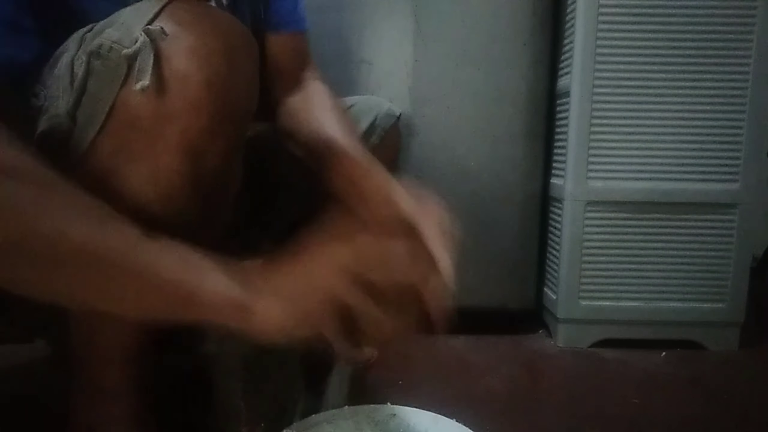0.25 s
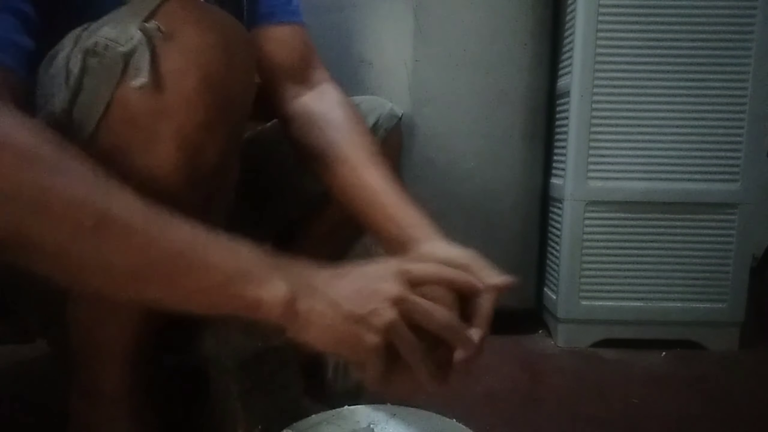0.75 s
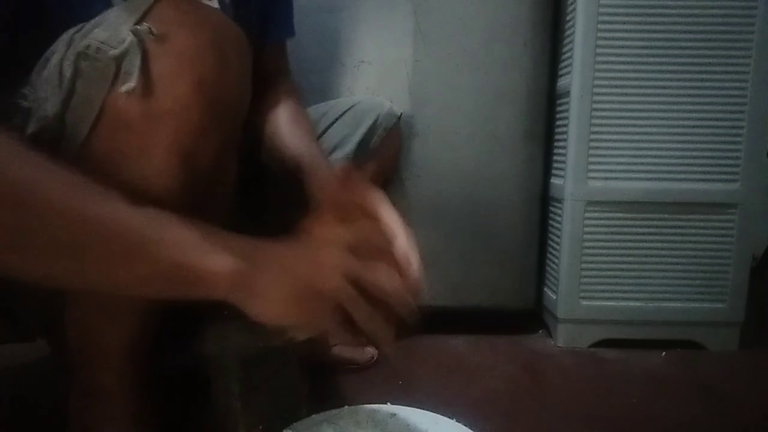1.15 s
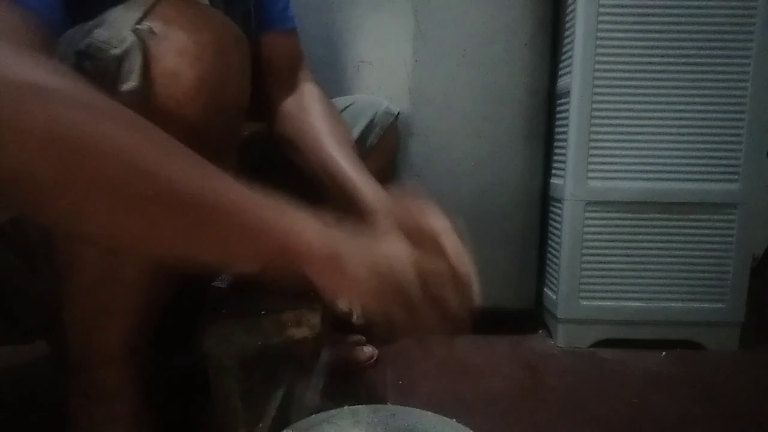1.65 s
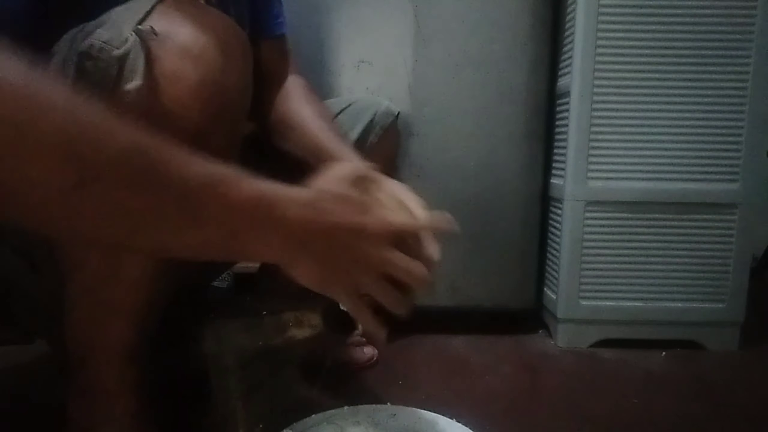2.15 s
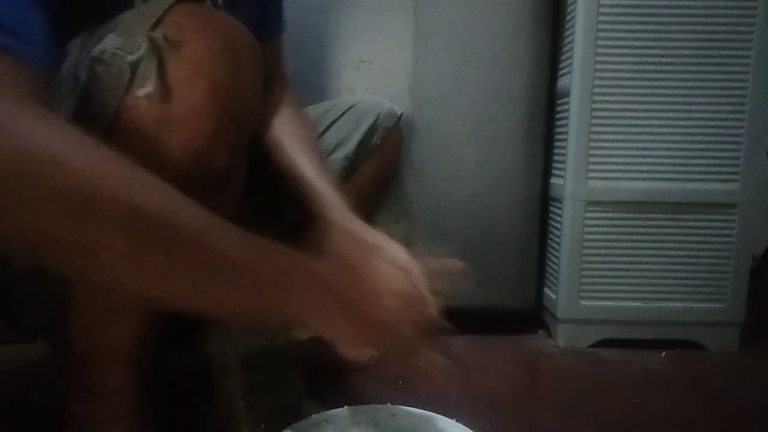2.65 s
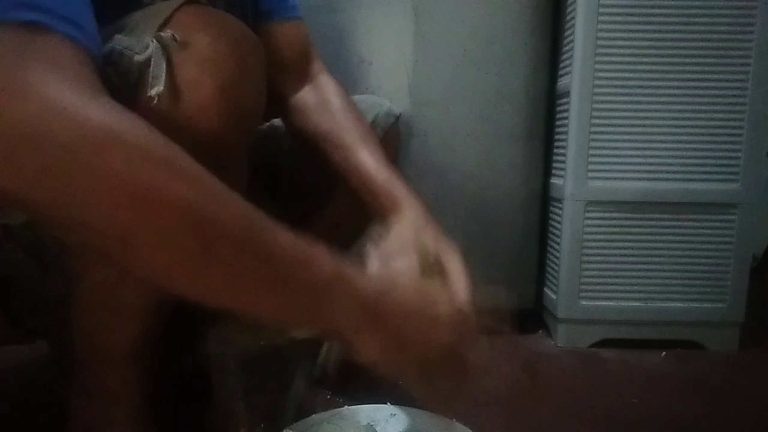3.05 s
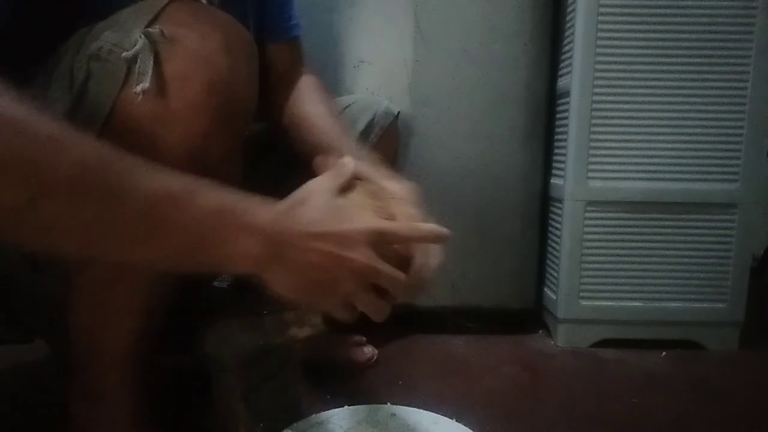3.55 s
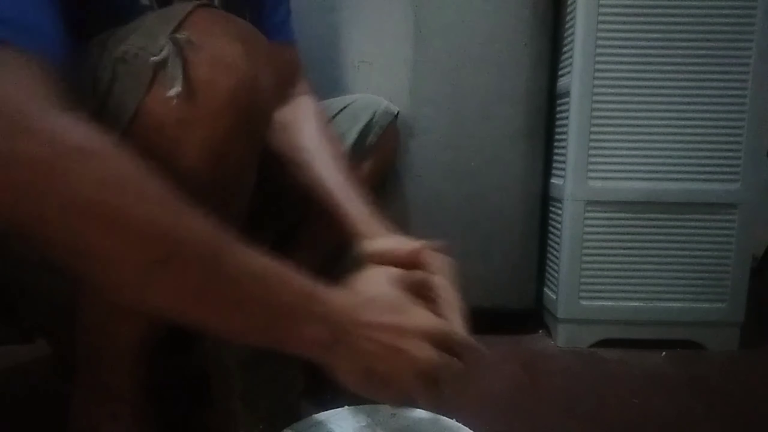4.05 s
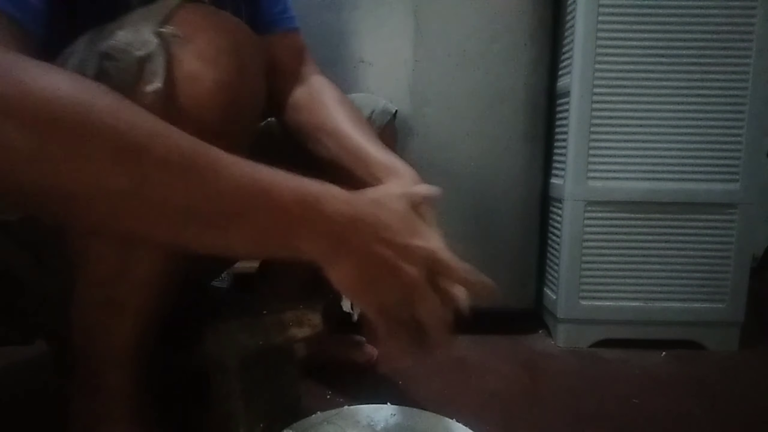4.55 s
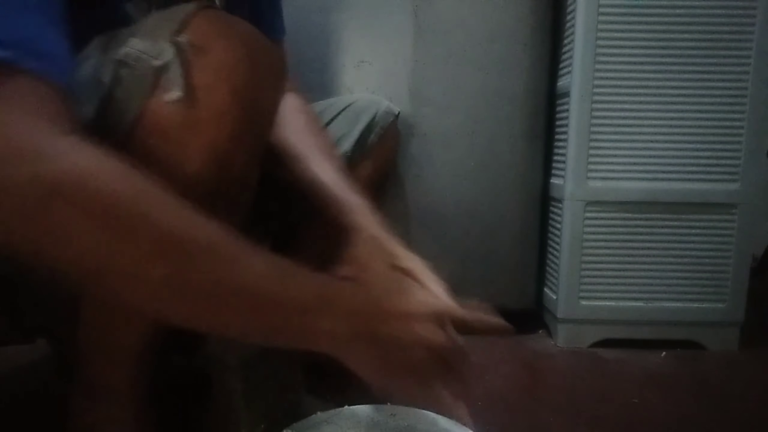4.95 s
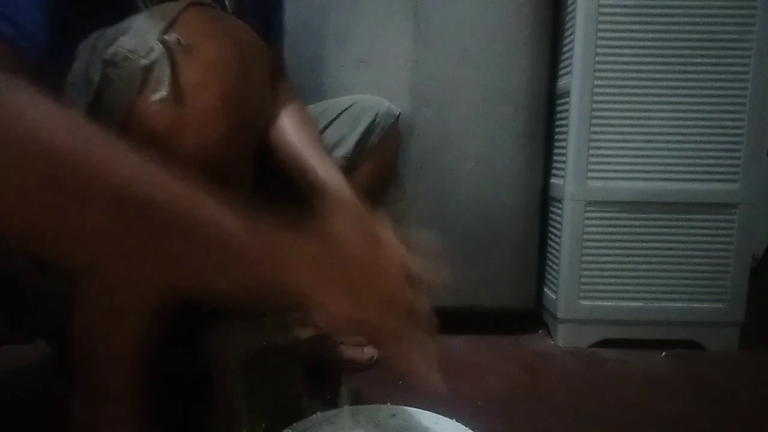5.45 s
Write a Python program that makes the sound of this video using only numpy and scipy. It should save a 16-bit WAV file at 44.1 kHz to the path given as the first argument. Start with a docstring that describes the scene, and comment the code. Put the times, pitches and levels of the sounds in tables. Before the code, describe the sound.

Half a coconut is rasped over a toothed metal blade in quick, short, woody scrapes, close up in a small hard room.

```python
"""A thin squeal dies away in the first third of a second, while the first strokes already begin.
Half a coconut is rasped over a toothed blade on a wooden stool, about three strokes a second: random snags
and harder bites drive damped modes of shell, blade and stool, and shaped noise tears the flesh.
The shell often taps the blade before a stroke; from 1.5 s on, resonant grit colours some light drags.
A small hard room and the low hum of the house last throughout; one phone microphone hears it all."""
import sys
import numpy as np
from scipy import signal
from scipy.fft import rfft, irfft, next_fast_len
from scipy.io import wavfile
from scipy.ndimage import uniform_filter1d

SR = 44100
rng = np.random.default_rng(int(sys.argv[2]) if len(sys.argv) > 2 else 0)


def linear_from_db(decibels):
    """Turn decibels (scalar or array-like) into linear amplitude factors; 0 gives 1."""
    return 10 ** (np.asarray(decibels, float) / 20)


def store_pcm(level_fs):
    """Save levels as 16-bit WAV."""
    pcm = np.round(np.clip(level_fs, -1, 1) * 32767).astype(np.int16)
    wavfile.write(sys.argv[1], SR, np.atleast_2d(pcm).T)


N = 251357
TIME = np.arange(N) / SR

# Damped modes of the struck parts. Each row: frequency in Hz, width in Hz, level in dB.
SHELL_HIGH_MODES = [(1372, 38, -1), (1524, 149, -5), (1646, 103, -2)]
SHELL_LOW_MODES = [(307, 41, -5.5), (421, 87.6, -4.5), (445.6, 53, -2.5), (523.5, 64, -6), (669, 63, -3.5),
                   (827, 105, 1.5), (931, 177, -0.5), (1072, 44, -5), (1157, 96, -13.5)]
BLADE_MODES = [(1949, 95, -2), (2331, 59, 1), (2510, 160, -4), (2857, 340, -3), (3070, 870, -12)]
STOOL_MODES = [(133, 18, 0), (168, 30, -6), (200, 22, -2)]
# Spectrum of tearing flesh. Each row: frequency in Hz, relative level in dB per Hz.
TEARING_SPECTRUM = [(900, 2), (1600, 6.5), (2400, -10.5), (3300, -2.5), (4100, -7.5), (5200, -11),
                    (8000, -14.5), (10000, -15.5), (12300, -16.5), (14000, -15), (16000, -5)]
# How each layer answers a stroke. Each holds: level in dB, then how strongly (as plain factors) it follows
# the rise, the fall, the lightness of the stroke and the push; last the curve of the fall, where
# 1 fades evenly and more holds on and stops short.
SHELL_HIGH_LAYER = (-0.017, 1.12, 1.34, 1.22, 0.47, 1.52)
SHELL_LOW_LAYER = (-0.77, 1, 1.02, 1.01, 0.45, 1.29)
BLADE_LAYER = (-3.5, 2.1, 1.16, 2.1, -1.1, 1.04)
STOOL_LAYER = (-12, -0.7, 0.7, 0.5, 3, 1.4)
TEARING_LAYER = (-6, 0.57, 0.85, 0.96, -0.43, 2.2)


def rasp():
    """Teeth plough the flesh: coarse snags ring shell, blade and stool, fine ones hiss; all judder together."""
    judder = linear_from_db(1.5 * walk(140) + 1.1 * walk(45))
    coarse = unit(judder * snags(rate=7000, scatter_db=1.2))
    fine = unit(np.sqrt(judder) * snags(rate=15000, scatter_db=1.2))
    skip = skips()
    parts = [(SHELL_HIGH_LAYER, SHELL_HIGH_MODES), (SHELL_LOW_LAYER, SHELL_LOW_MODES),
             (BLADE_LAYER, BLADE_MODES), (STOOL_LAYER, STOOL_MODES)]
    body = 0
    for layer, modes in parts:
        drive = coarse * contact_gain(layer) * skip
        # dividing by the steady ring puts all parts on one scale
        body = body + ring(drive, modes, wander_db=2.02) / np.std(ring(coarse, modes))
    fine = patchy(fine, patchy_db=2.2, rate=60)
    torn = colour(fine * contact_gain(TEARING_LAYER) * np.sqrt(skip), TEARING_SPECTRUM)
    return body + torn / np.std(colour(fine, TEARING_SPECTRUM))


# The strokes, light ones too. Each row: start in seconds, rise in seconds, fall in seconds,
# stroke level in dB, push into the stool in dB; each layer weighs the last two in its own way.
STROKES = [(0.073, 0.012, 0.022, -45, 0.5), (0.102, 0.076, 0.06, -28, 1), (0.386, 0.078, 0.11, -31.5, .5),
           (0.689, 0.058, 0.089, -31, 0), (1.21, 0.087, 0.076, -30, 0.5), (1.475, 0.065, .15, -44, -3),
           (1.535, 0.056, 0.098, -28, 2.5), (1.76, 0.068, .17, -50, -2.5), (1.829, 0.07, 0.1, -29.5, 0.5),
           (1.99, 0.041, 0.17, -45, -1.5), (2.367, 0.1, 0.068, -31.5, -0.5), (2.684, 0.056, 0.098, -29, 2),
           (2.981, 0.072, 0.09, -28.5, 1.5), (3.286, 0.054, 0.09, -26, 1.5), (3.732, 0.1, 0.082, -32, -3),
           (4.052, 0.046, 0.097, -29.5, -1), (4.341, .031, 0.058, -36.5, -2),
           (4.395, 0.029, 0.098, -34.5, -3), (4.79, .031, 0.053, -59, 1), (4.925, 0.09, 0.095, -34.5, -2),
           (5.233, 0.06, 0.091, -31.5, -0.5), (5.508, 0.075, 0.064, -32, -3.5)]
FULL_DB = -30  # stroke level at which every layer stands alike, push aside
# the teeth meet the flesh, then the level climbs, fast at first; layers scale the climb and the drop
CONTACT_S, RISE_DB, RISE_CURVE, FALL_DB = 0.014, 17.5, 2.87, 20.5
# the shell trails lightly over the teeth as it lifts, deeper down for layers that stop short
LINGER_DB, LINGER_FADE_DB_PER_S = -22.5, 75
# after a tap the shell slides lightly on the blade; level against the tap
DRAG_DB, DRAG_FADE_DB_PER_S = -27.5, 167
FUMBLE_DB = -70.5  # hands shift the shell; a steady floor before the layer level


def contact_gain(layer):
    """Gain of one layer over time: the strokes, the slide after each tap and the fumbling, added as powers."""
    layer_db, rise_share, fall_share, light_share, push_share, fall_curve = layer
    power = np.full(N, linear_from_db(2 * FUMBLE_DB))
    for s, rise, fall, peak_db, push_db in STROKES:
        at = slice(int(s * SR), int((s + rise + 4 * fall) * SR))
        t = TIME[at] - s
        before = np.clip(1 - t / rise, 0, 1)
        after = np.clip((t - rise) / fall, 0, None)
        top_db = FULL_DB + light_share * (peak_db - FULL_DB) + push_share * push_db
        climb_db = rise_share * RISE_DB * before ** RISE_CURVE
        drop_db = fall_share * FALL_DB * after ** fall_curve
        stroke = linear_from_db(top_db - climb_db - drop_db)
        linger = linear_from_db(top_db + fall_curve * LINGER_DB - LINGER_FADE_DB_PER_S * np.abs(t - rise))
        contact = np.clip(t / CONTACT_S, 0, 1)
        power[at] += (stroke ** 2 + linger ** 2) * contact ** 2
    for s, tap_db, *_ in TAPS:
        at = slice(int(s * SR), int(s * SR) + SR // 5)
        drag_db = tap_db + DRAG_DB - DRAG_FADE_DB_PER_S * (TIME[at] - s)
        power[at] += linear_from_db(2 * drag_db)
    return linear_from_db(layer_db) * np.sqrt(power)


def patchy(x, patchy_db, rate):
    """Teeth of different bite come and go, so each slice of the spectrum flickers by itself."""
    edges = np.geomspace(800, 17000, 17)
    out = 0
    for k, pair in enumerate(zip(edges, edges[1:])):
        band = signal.butter(2, pair, "band", fs=SR, output="sos")
        # neighbouring slices meet in opposite phase, so every other one is turned over
        out = out + (-1) ** k * signal.sosfilt(band, x) * linear_from_db(patchy_db * walk(rate))
    return out


# A tooth bites deep and lets go. Each row: time in seconds, relative level in dB,
# then low shell ring and crack, both in dB against that level.
BITES = [(0.119, -14.5, 0, -23), (0.134, -17, -9, -29), (0.167, -12, -8, -5), (0.399, -26, 8.5, -20),
         (0.418, -21, -17, -20), (0.459, -19, -23, -2), (0.698, -27, -5, -6), (0.719, -15, 5.5, 1.5),
         (1.247, -14, 9, -25), (1.271, -0.5, -6.5, -22), (1.552, -6, -8, -10), (1.579, -12, -16, -27),
         (1.859, -19, 12, -32), (1.903, -16, 12, -15), (2.41, -5.5, -22, -13), (2.444, -15, -24, 2),
         (2.702, -26, 1, 5), (2.715, -14, -19, -12), (2.742, -9.5, -24, -10), (2.773, -14, 9, -25),
         (3.017, 4.5, -23, -36), (3.06, -29, -10, -23), (3.296, -9.5, -13, -33), (3.314, -2, -19, -32),
         (3.349, -8, 3.5, -30), (3.804, -30, -7, -23), (4.064, -9.5, -10, -16), (4.111, -5, -19, -24),
         (4.371, -12, 2.5, -15), (4.411, -21, -20, 2), (4.499, -30, 11.5, -7), (4.814, -27, 7, -31),
         (4.949, -16, 1, -11), (5.262, -18, 15, -17), (5.287, -21, -19, -23), (5.543, -18, 10.5, -11),
         (5.573, -3.5, -23, -15.5)]


def tooth_bites():
    """A deep bite lets go in a short chatter that rings shell, blade and stool and cracks the flesh."""
    return blows(BITES, burst_s=0.005, body_db=3, blade_db=-8.5, stool_db=1, crack_db=-5)


def skips():
    """After a deep bite the shell jumps clear for a moment: the rasp dips, the more the harder the bite."""
    delay_s, spread_s = 0.022, 0.009
    dip_db, hard_bite_db = -3, -2.5  # a bite at the hard level dips by this much
    total_db = 0
    for s, db, *_ in BITES:
        bell = np.exp(-.5 * ((TIME - s - delay_s) / spread_s) ** 2)
        total_db = total_db + dip_db * linear_from_db(db - hard_bite_db) * bell
    return linear_from_db(total_db)


# The shell taps the blade. Each row: time in seconds, relative level in dB,
# then low shell ring and crack, both in dB against that level.
TAPS = [(0.363, -24.5, 2, -20), (0.66, -24.5, 4, -15.5), (1.067, -34.5, 6.5, -15), (1.49, -28.5, -20, -27),
        (1.769, -37.5, -8, -15), (2.656, -33, 15, -7), (2.965, -22.5, 0, -16), (3.254, -21.5, 3, -13.5),
        (3.649, -27.5, -0.5, -15), (4.03, -23.5, 2, -16.5), (4.773, -36.5, 1, -17), (4.796, -40, 5, -35),
        (5.223, -36, 3.5, -16.5), (5.496, -32, 2, -12)]


def shell_taps():
    """A tap is a very short chatter of shell on blade, ringing the whole body."""
    return blows(TAPS, burst_s=0.002, body_db=13.5, blade_db=6, stool_db=8, crack_db=12)


def blows(events, burst_s, body_db, blade_db, stool_db, crack_db):
    """Each blow is a chatter of contacts that builds fast and dies, into the same shell, blade, stool and flesh."""
    size = int(.04 * SR)
    t = np.arange(size) / SR / burst_s
    burst = t ** 0.4 * np.exp(-t) * np.sign(rng.standard_normal((len(events), size)))
    high, low, crack = np.zeros((3, N + size))
    for (s, db, low_db, top_db), contacts in zip(events, burst):
        start = int((s - .001) * SR)  # the chatter begins 1 ms ahead of the listed time
        at = slice(start, start + size)
        high[at] += linear_from_db(db) * contacts
        low[at] += linear_from_db(db + low_db) * contacts
        crack[at] += linear_from_db(db + top_db) * contacts
    shell = ring(high[:N], SHELL_HIGH_MODES) + ring(low[:N], SHELL_LOW_MODES)
    blade = ring(high[:N], BLADE_MODES)
    stool = ring(high[:N], STOOL_MODES)
    flesh = colour(crack[:N], TEARING_SPECTRUM)
    return linear_from_db(body_db) * shell + linear_from_db(blade_db) * blade + linear_from_db(stool_db) * stool + linear_from_db(crack_db) * flesh


# The shell drags lightly over the teeth, mostly within the light strokes. Each row: start in seconds,
# length in seconds, centre in Hz, width of each of two like resonances in Hz, level in dB.
LIGHT_DRAGS = [(1.481, .07, 5300, 3500, -53.5), (1.77, 0.12, 2230, 1400, -50),
               (2.011, 0.19, 2850, 4270, -50.5), (4.26, 0.12, 2210, 915, -54),
               (4.637, 0.05, 6500, 4000, -77), (4.795, 0.065, 1300, 1020, -46.5)]


def light_drags():
    """Gritty hiss of the shell dragging lightly over the teeth: snags through two resonances, quick to start."""
    out = 0
    grit = snags(rate=9000, scatter_db=1.8)
    for s, length, hz, width, db in LIGHT_DRAGS:
        part = np.clip((TIME - s) / length, 0, 1)
        touch = np.sin(np.pi * np.sqrt(part))
        mode = [(hz, width, 0)]
        out = out + linear_from_db(db) * touch * unit(ring(ring(grit, mode), mode))
    return out


# Path of the squeal. Each row: time in seconds, pitch in Hz, rms level of the fundamental in dB.
SQUEAL = [(0, 3785, -52), (.045, 3781, -49.5), (.09, 3778, -54), (.135, 3776, -48.5), (.19, 3768, -54),
          (.24, 3758, -67), (.29, 3756, -67), (.34, 3755, -82)]
# Overtones 2 to 4 in dB against the fundamental. First row: while it is near; second: once turned away.
SQUEAL_OVERTONES_DB = [(-10.5, -23, -26), (-23, -32, -44)]


def squeal():
    """A thin tone with overtones, sinking slightly in pitch as it fades."""
    s, hz, db = np.transpose(SQUEAL)
    phase = 2 * np.pi * np.cumsum(np.interp(TIME, s, hz)) / SR
    tone = np.sin(phase)
    for k, (near_db, away_db) in enumerate(zip(*SQUEAL_OVERTONES_DB)):
        overtone_db = np.interp(TIME, [.045, .075], [near_db, away_db])
        tone = tone + linear_from_db(overtone_db) * np.sin((k + 2) * phase)
    level = linear_from_db(np.interp(TIME, s, db)) * (TIME < s[-1])
    return np.sqrt(2) * tone * level


# Spectrum of the house murmur. Each row: frequency in Hz, relative level in dB per Hz.
HOUSE_SPECTRUM = [(20, 5.5), (40, -11), (68, 3), (95, -23), (230, -15), (450, -9), (1000, -10), (1600, -14),
                  (2400, -19.5), (4800, -29.5), (8000, -34), (11600, -34), (14000, -31.5), (16000, -27)]
# One row for the hum: centre in Hz, width in Hz, mean level in dB.
HUM = (129, 21.7, -54.5)


def house():
    """Broad murmur of shaped noise, with a wavering low hum made of noise through one resonance."""
    murmur = unit(colour(rng.standard_normal(N), HOUSE_SPECTRUM)) * linear_from_db(-53.5 + 1.1 * walk(5.26))
    hz, width, db = HUM
    hum = unit(ring(rng.standard_normal(N), [(hz, width, 0)]))
    return murmur + hum * linear_from_db(db + 2.3 * walk(5.1))


def room(x):
    """Hard walls: a dense tail after a few milliseconds, the treble dying first, little bass returned."""
    t60_s, tail_db = 0.2, -16.5
    t = np.arange(int(.5 * SR)) / SR
    noise = rng.standard_normal((2, len(t)))
    dull = signal.lfilter([.3], [1, -.7], noise[0]) * linear_from_db(-60 * t / t60_s)
    bright = 0.45 * noise[1] * linear_from_db(-60 * t / (0.64 * t60_s))
    tail = (dull + bright) * (t > .004)
    tail = signal.sosfilt(signal.butter(2, 350, "high", fs=SR, output="sos"), tail)
    tail = tail / np.sqrt(np.sum(tail ** 2))
    return x + linear_from_db(tail_db) * signal.fftconvolve(x, tail)[:N]


def snags(rate, scatter_db):
    """Fibres catch and snap at random, rate a second on average, a few much harder than the rest."""
    chance = rng.random((3, N))
    caught = chance[0] < rate / SR
    sign = np.sign(chance[1] - .5)
    return unit(caught * sign * linear_from_db(-scatter_db * np.log(chance[2] + 1e-9)))


def ring(x, modes, wander_db=0.):
    """Damped modes; the grip on the shell shifts, so each is driven now more, now less."""
    out = 0
    for k, (hz, width, db) in enumerate(modes):
        pole = np.exp(-np.pi * width / SR)
        drive = x * linear_from_db(wander_db * walk(24.998))
        poles = [1, -2 * pole * np.cos(2 * np.pi * hz / SR), pole ** 2]
        mode = (1 - pole) * signal.lfilter([1, 0, -1], poles, drive)
        out = out + (-1) ** k * linear_from_db(db) * mode  # neighbours in opposite sign
    return out


def walk(rate):
    """Random levels held 1 / rate s and slewed twice; spread near 1."""
    k = int(SR / rate)
    held = np.repeat(rng.standard_normal(N // k + 1), k)
    return 1.25 * uniform_filter1d(uniform_filter1d(held, k), k)[:N]


def colour(x, points):
    """Shape by a (Hz, dB) spectrum, drawn straight over log frequency."""
    hz, db = np.transpose(points)
    size = next_fast_len(N + SR // 10)
    bins = np.arange(size // 2 + 1) * SR / size + 1
    gain = linear_from_db(np.interp(np.log(bins), np.log(hz), db))
    return irfft(rfft(x, size) * gain, size)[:N]


def unit(x):
    """Scale to rms 1."""
    return x / np.sqrt(np.mean(x ** 2))


def scene():
    """Grater in the room, with the squeal, over the house."""
    grater = rasp() + shell_taps() + tooth_bites() + light_drags()
    # a small stool radiates little deep bass
    grater = signal.sosfilt(signal.butter(2, 95, "high", fs=SR, output="sos"), grater)
    return (room(grater) + squeal() + house())[None]


def band_limit(x):
    """A steep low-pass at the top of the band."""
    return signal.sosfilt(signal.butter(12, 16100, fs=SR, output="sos"), x)


# Resonances of the microphone port. Each row: centre in Hz, width in Hz, lift at the centre in dB.
PORT = [(6600, 720, 10), (14800, 330, 7.5)]


def record(dry):
    """The microphone port lifts two treble bands; the phone cuts the top steeply at 15480 Hz."""
    x = dry
    for hz, width, db in PORT:
        peak = signal.lfilter(*signal.iirpeak(hz, hz / width, SR), x)
        x = x + (linear_from_db(db) - 1) * peak
    x = signal.sosfilt(signal.ellip(14, .3, 60, 15480, fs=SR, output="sos"), x)
    return band_limit(x)


dry = scene()
out = record(dry)
store_pcm(out)
```